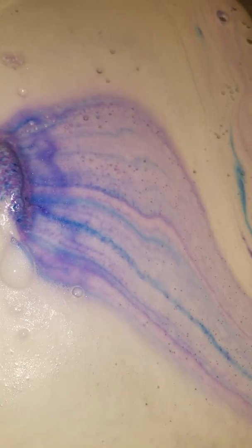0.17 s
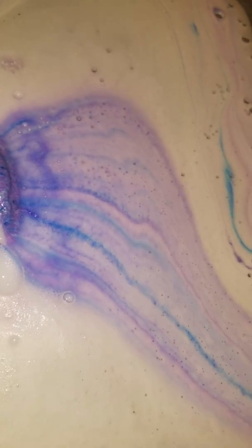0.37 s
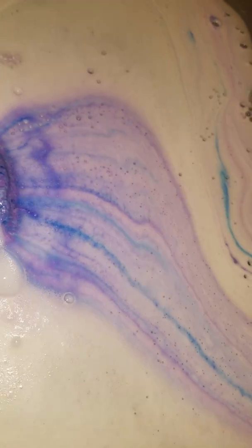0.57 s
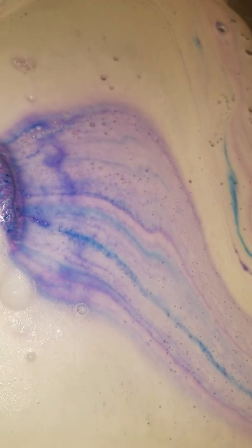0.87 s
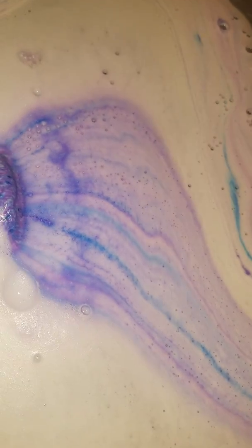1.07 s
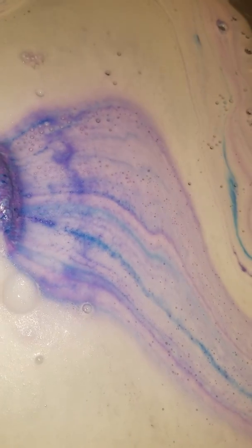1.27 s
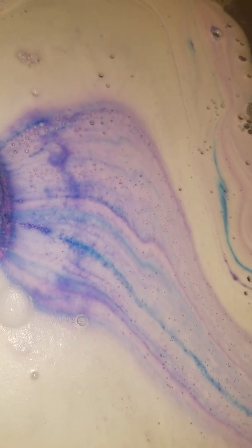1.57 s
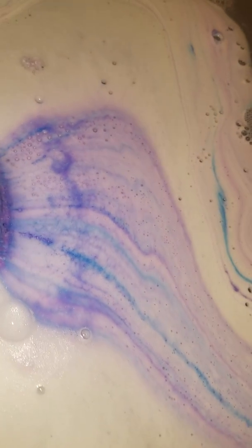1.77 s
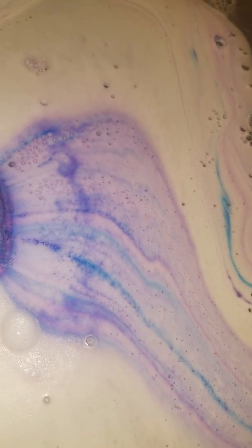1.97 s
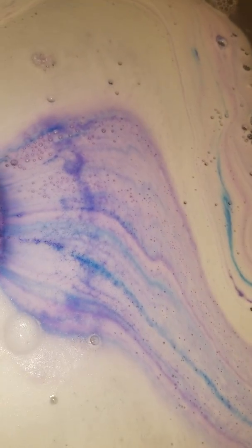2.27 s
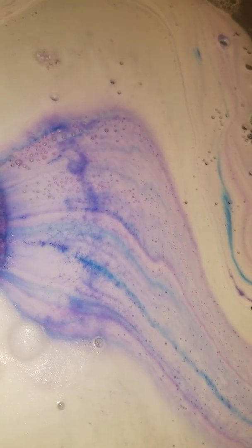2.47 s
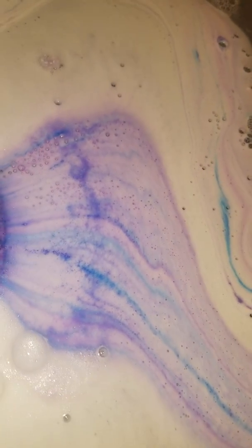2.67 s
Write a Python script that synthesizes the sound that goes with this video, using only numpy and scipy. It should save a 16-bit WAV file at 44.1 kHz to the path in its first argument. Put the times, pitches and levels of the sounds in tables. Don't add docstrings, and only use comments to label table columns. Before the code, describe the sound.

A bath bomb fizzes softly in a tub over low ventilation rumble, with late water drips

```python
import sys
import numpy as np
from scipy import signal
from scipy.fft import rfft, irfft
from scipy.io import wavfile

SR = 44100
rng = np.random.default_rng(int(sys.argv[2]) if len(sys.argv) > 2 else 0)


def int16_out(signal):
    q = np.round(np.clip(np.atleast_2d(signal).T, -1, 1) * 32767)
    wavfile.write(sys.argv[1], SR, q.astype(np.int16))


def nominal_scale(level):
    x = np.asarray(level, float) / 20
    return 10 ** x


N = 124362
BIN_HZ = np.fft.rfftfreq(N, 1 / SR)
LEFT_RIGHT = np.array([[1], [-1]])


def evened(x):
    return x / np.sqrt(np.mean(x ** 2) + 1e-20)


def read(points, hz):
    f, value = np.transpose(points)
    return np.interp(np.log(hz + 1), np.log(f + 1), value)


def add(mix, start_s, sound):
    part = mix[round(start_s * SR):][:len(sound)]
    part += sound[:len(part)]


def ports(pan_db, lead_rad):
    return np.array([nominal_scale(pan_db / 2) + 0j, nominal_scale(-pan_db / 2) * np.exp(1j * lead_rad)])


def drift(top_hz, depth_db):
    t = np.arange(N) / SR
    rates_hz = np.geomspace(.4, top_hz, 12)
    sway = sum(np.sin(2 * np.pi * (f * t + rng.random())) / np.sqrt(f) for f in rates_hz)
    return nominal_scale(depth_db * evened(sway))


def room(x):
    # frequency in Hz, t60 in s.
    tile_t60 = [(500, 0.35), (1200, 0.23), (1700, 0.17), (2150, 0.27), (2800, 0.27), (6000, 0.16),
                (10000, 0.23), (14000, 0.17)]
    first_echo_s, rise_s = .004, .0021
    size = SR // 2
    slots = np.arange(0, size - 16, 16)
    shape = (2, len(slots))
    taps = np.zeros((2, size))
    np.put_along_axis(taps, slots + rng.integers(0, 16, shape), rng.choice([-1., 1.], shape), 1)
    taps *= np.clip((np.arange(size) / SR - first_echo_s) / rise_s, 0, 1)
    hz, t, z = signal.stft(taps, SR, nperseg=128)
    decay = nominal_scale(-60 * t / read(tile_t60, hz)[:, None])
    tail = signal.istft(z * decay, SR, nperseg=128)[1]
    tail /= np.linalg.norm(tail[0])
    return signal.fftconvolve(x[None], tail, axes=1)[:, :len(x)]


def grains(count, per_s, spread_db):
    size = nominal_scale(spread_db * np.minimum(rng.exponential(1, count), 4)) * rng.choice([-1., 1.], count)
    return size * (rng.random(count) < per_s / SR)


def fizz():
    # frequency in Hz, level in dB.
    colour = [(250, 3), (420, -7), (1100, -2.5), (1250, -9), (2000, -14), (3000, -21.5), (5000, -31.5),
              (8000, -38)]
    level_db, pan_db, bursts_per_s, spread_db = -52, -2, 5000, 2.5
    floor_hz, port_likeness = 260, 0.00037
    lead_in = SR // 2
    wet = 0
    for _ in range(6):
        wet = wet + room(grains(N + lead_in, bursts_per_s, spread_db))[:, lead_in:]
    wet = np.array([wet[0], port_likeness * wet[0] + wet[1]])
    shape = nominal_scale(read(colour, BIN_HZ)) / (1 + (floor_hz / (BIN_HZ + 1)) ** 4)
    froth = evened(irfft(rfft(wet) * shape, N))
    return nominal_scale(level_db + pan_db / 2 * LEFT_RIGHT) * froth * drift(top_hz=8.4, depth_db=.5)


def hiss():
    # frequency in Hz, level in dB.
    colour = [(3000, -16.5), (6000, -14.5), (8500, -24), (10500, -16), (11800, -14.5), (12600, -9),
              (14500, -5.5), (15700, -5.5)]
    # frequency in Hz, left-right in dB.
    balance = [(5000, -16), (8500, 9), (12000, 3.5), (15500, 3)]
    level_db, pops_db = -67, -100
    pops = nominal_scale(pops_db - level_db) * evened(grains(N, per_s=60, spread_db=-6))
    raw = rng.standard_normal((2, N)) + pops + room(pops)
    z = rfft(raw) * nominal_scale(read(colour, BIN_HZ)) * ports(read(balance, BIN_HZ), 0)
    return nominal_scale(level_db) * evened(irfft(z, N)) * drift(top_hz=10, depth_db=.25)


def bubble(start_s, db, start_hz, end_hz, decay_s):
    glide, glide_bend, swell_end = 1.022, 1.473, .653
    u = np.arange(0, 6 * decay_s, 1 / SR) / decay_s
    hz = end_hz + (start_hz - end_hz) * np.exp(-(u / glide) ** glide_bend)
    rise = np.sin(np.pi / 2 * np.minimum(u / swell_end, 1)) ** 2
    swell = rise * np.exp(-np.maximum(u - swell_end, 0))
    return start_s, nominal_scale(db) * 2 * swell * np.sin(2 * np.pi * np.cumsum(hz) / SR)


def tick(start_s, db, hz, width_hz, length_s):
    snap = 4
    t = np.arange(0, 4 * length_s, 1 / SR)
    puff = rng.standard_normal(800)[:len(t)] * np.exp(-t / length_s) * np.minimum(t / 0.0001, 1)
    puff += snap * (np.arange(len(t)) == round(length_s * SR / 2))
    pole = np.exp(-np.pi * width_hz / SR)
    turn = np.exp(2j * np.pi * hz * t)
    once = signal.lfilter([1], [1, -pole], puff / turn)
    band = (turn * signal.lfilter([1], [1, -pole], once)).real
    return start_s, nominal_scale(db) * 2 * evened(band) / 2.3


def echo_coloured(x):
    # frequency in Hz, level in dB.
    colour = [(900, -7), (1250, 13.5), (1570, -4), (1950, 1.5), (2200, 7.5), (2600, 1.5), (5000, 0.5),
              (9000, -1.5)]
    return irfft(rfft(x) * nominal_scale(read(colour, BIN_HZ)), N)


def drips(rows, source, wet_db, pan_db, walls_db, lag_s=.00034):
    # delay in s, level in dB.
    wall_echoes = [
        [(.0062, -9), (.0165, -9), (.0225, -10)],
        [(.0040, -5), (.0210, -8), (.0255, -10)],
    ]
    tail_pan_db = 3
    mix = np.zeros(N)
    for row in rows:
        add(mix, *source(*row))
    thrown = echo_coloured(mix)
    heard = []
    for port in wall_echoes:
        heard.append(mix + sum(nominal_scale(db + walls_db) * np.roll(thrown, round(s * SR)) for s, db in port))
    left = np.roll(heard[0], round(lag_s * SR)) * nominal_scale(pan_db / 2)
    right = heard[1] * nominal_scale(-pan_db / 2)
    return np.array([left, right]) + nominal_scale(wet_db + tail_pan_db / 2 * LEFT_RIGHT) * room(thrown)


def plop():
    # start in s, level in dB, start and end frequency in Hz, decay in s.
    big_bubble = [
        (2.341, -27.7, 1254, 2130, .0057),
    ]
    # delay in ms, gain.
    paths = [
        [(1.0, 1), (4.9, -.24), (6.53, -.2), (7.78, .17), (10.86, -.36), (12.06, .33), (13.02, .23),
         (16.67, -.16), (19.66, -.3)],
        [(.25, -.4), (1.63, -1), (2.63, .45), (4.17, .48), (5.51, .31), (18.1, .25), (19.39, -.22),
         (21.16, -.3), (26.6, -.37)],
    ]
    tail_s, tail_db = 0.014, -7.5
    mix = np.zeros(N)
    for row in big_bubble:
        add(mix, *bubble(*row))
    early = [sum(gain * np.roll(mix, round(ms * SR / 1000)) for ms, gain in port) for port in paths]
    late = np.roll(echo_coloured(mix), round(tail_s * SR))
    return np.array(early) + nominal_scale(tail_db) * room(late)


def impact():
    # start in s, level in dB, start and end frequency in Hz, decay in s.
    cavity = (2.3356, -37.5, 1500, 800, .0019)
    return drips([cavity], bubble, wet_db=-5, pan_db=-2.4, walls_db=-12, lag_s=0)


def blips():
    # start in s, level in dB, start and end frequency in Hz, decay in s.
    small_bubbles = [
        (2.485, -62, 2250, 2600, .004),
        (2.488, -56.5, 3700, 6100, .0016),
        (2.4975, -59, 2900, 3280, .007),
        (2.5142, -54, 2750, 2580, .0045),
    ]
    return drips(small_bubbles, bubble, wet_db=-12, pan_db=-2.4, walls_db=-8)


def splashes():
    # start in s, level in dB, centre and width in Hz, length in s.
    surface_ticks = [(.103, -74, 7500, 5000, .0009), (.153, -77, 9000, 4000, .0009),
                     (.287, -72, 8000, 6000, .001), (.6115, -65, 5000, 3500, 0.00075),
                     (.6117, -75, 10500, 6000, .0009), (1.284, -69, 14500, 4000, 0.0018),
                     (2.2737, -48, 14700, 3000, 0.0017), (2.274, -53, 12540, 2600, 0.001),
                     (2.3356, -59, 4300, 3000, 0.0019), (2.3358, -69, 9000, 6000, .001),
                     (2.4885, -63, 4500, 4000, .0012), (2.5142, -55, 9800, 1410, 0.0025),
                     (2.5132, -60, 14800, 2500, 0.002), (2.5138, -66, 12200, 3000, 0.0026),
                     (2.5142, -71, 6470, 2000, 0.0018), (2.5145, -58, 4260, 2500, 0.002),
                     (2.272, -64, 5100, 3000, 0.0015),
        (2.274, -73, 9400, 3060, 0.00086),
    ]
    return drips(surface_ticks, tick, wet_db=-3, pan_db=2, walls_db=-5)


def modes(table, width_hz):
    out = 0
    for f, db, pan_db, lead_rad in table:
        off = (BIN_HZ - f) / width_hz
        ring = rfft(rng.standard_normal(N)) / (1 + (off * 1.21) ** 2 + off ** 4)
        ring /= np.sqrt(2 * np.sum(abs(ring) ** 2)) / N
        out = out + nominal_scale(db) * ports(np.array([pan_db]), lead_rad) * ring
    return irfft(out, N)


def tub_ring():
    # frequency in Hz, level in dB, left-right in dB, right lead in radians.
    tub_modes = [(499, -68, 11, -6), (564, -73, 13, -0.5), (623, -77, 7, 4.5), (661, -60.5, -1, 0.2),
                 (706.7, -58, -1.5, -1.5), (748, -66.5, -12, 2), (727, -73, 12, -3), (786.7, -61, 4, -0.34),
                 (852.3, -60, -9, 1.0), (895, -75, -29.5, 0), (950, -62, 1.5, 3), (1003, -62.5, 2, 0.5),
                 (1061, -64.5, 7.5, -4.5), (1180, -67.5, 6, 2)]
    high_modes = [(1331, -64.5, 1, 3.5), (1620, -67.5, -2, 2), (1754, -72, 0, 1.5), (2230, -102, -14, -4.5),
                  (2601, -73.5, -14, 1), (3140, -84, -15, -3), (3340, -94, -4.5, -0.5),
                  (3270, -106.5, -11, 2)]
    return modes(tub_modes, width_hz=24.3) + modes(high_modes, width_hz=42 * 1.6)


def room_ring():
    # frequency in Hz, level in dB, left-right in dB, right lead in radians.
    low_modes = [(84.7, -42.5, 1, 0.28), (120.8, -41.5, -3, 0.067), (144.6, -41.5, 0.2, 0.045),
                 (176, -42.5, -4, 0.36), (211, -53.5, -2, 0.034), (268.1, -48, 0.5, 0.067),
                 (301, -49.5, -10, 0.4), (345, -50, -6, 0.061), (398.8, -53.5, -7, 0.057),
                 (465.5, -58.5, -14.5, 2.83), (485.6, -55.5, 6.5, 2.33)]
    side_modes = [(96, -44.5, -.3, .28), (245, -52.5, -4.5, .2), (357, -52, 3, .3), (430, -58, 0, 1),
                  (885, -61, 4, 2.5), (1090, -62, -2, -2), (1130, -63, 0, -2)]
    return modes(low_modes, width_hz=19.4) + modes(side_modes, width_hz=24)


def rumble():
    # frequency in Hz, level in dB.
    colour = [(20, 2), (45, -14), (62, -22), (80, 5), (160, -4), (200, 7), (380, 7), (600, -46)]
    # frequency in Hz, left-right in dB.
    balance = [(60, -2), (150, 16), (260, -30.5), (400, 5.5)]
    level_db, lead_rad = -48, 0.7
    z = rfft(rng.standard_normal(N)) * nominal_scale(read(colour, BIN_HZ))
    return nominal_scale(level_db) * evened(irfft(z * ports(read(balance, BIN_HZ), lead_rad), N))


def building_shake():
    # frequency in Hz, level in dB, left-right in dB, right lead in radians.
    shake_modes = [
        (28, -69, 1, .3),
        (54, -63, 0, .28),
    ]
    return modes(shake_modes, width_hz=18)


def fan_whistle():
    # frequency in Hz, level in dB, left-right in dB, right lead in radians.
    whistle = [
        (11850, -88, 1.5, 1.5),
    ]
    return modes(whistle, width_hz=260)


def scene():
    foam = fizz() + hiss()
    water = impact() + plop() + blips() + splashes()
    air = nominal_scale(-4) * (room_ring() + rumble() + tub_ring())
    return foam + water + air + building_shake() + fan_whistle()


def low_pass(x):
    return signal.sosfilt(signal.butter(12, 16510, fs=SR, output="sos"), x)


def record(dry):
    edge_hz, offset = 15830, -.0006
    kept = irfft(rfft(dry) * (BIN_HZ < edge_hz), N)
    return low_pass(kept + offset)


dry = scene()
out = record(dry)
int16_out(out)
```